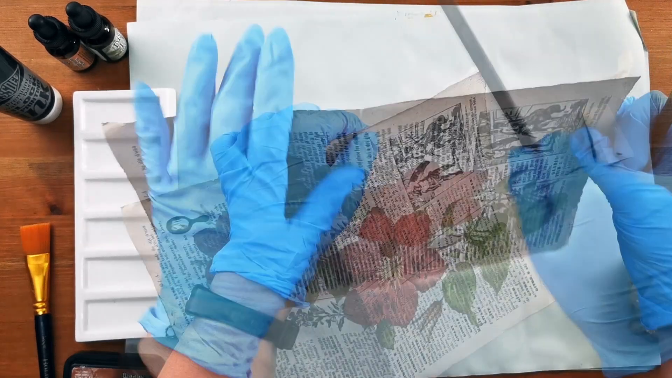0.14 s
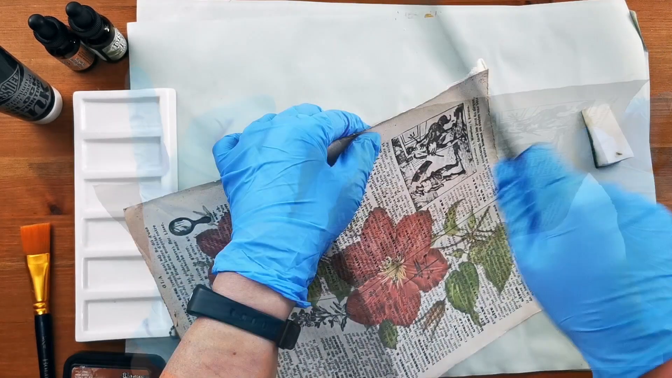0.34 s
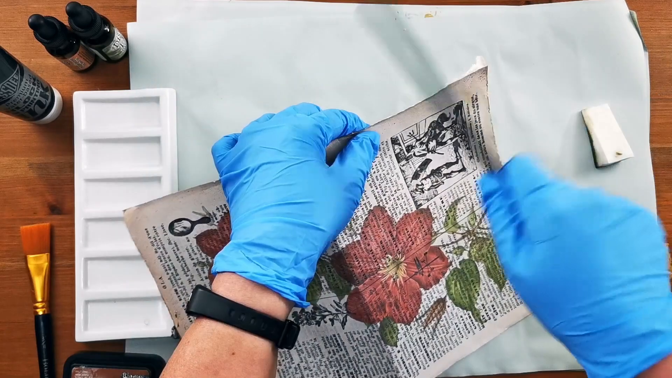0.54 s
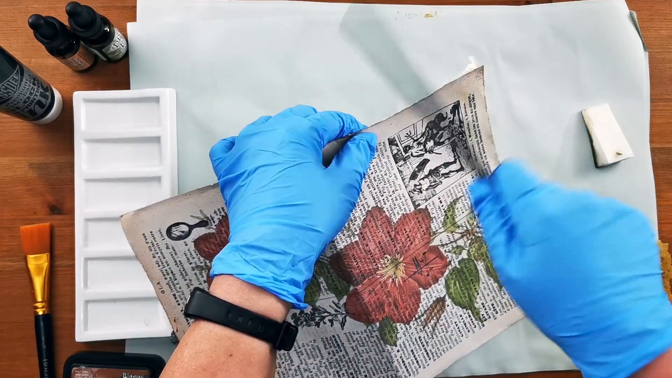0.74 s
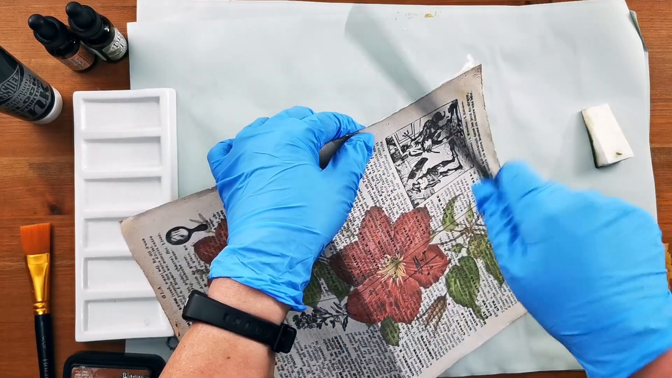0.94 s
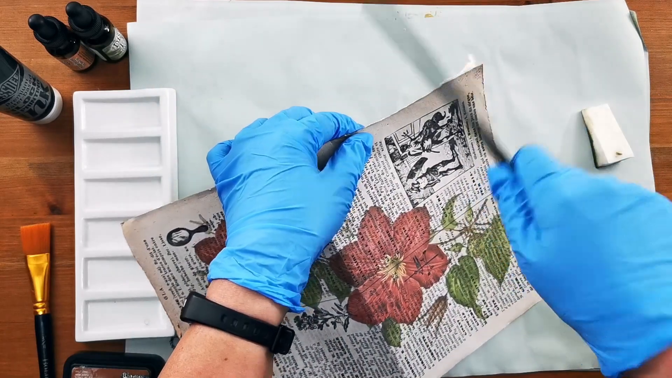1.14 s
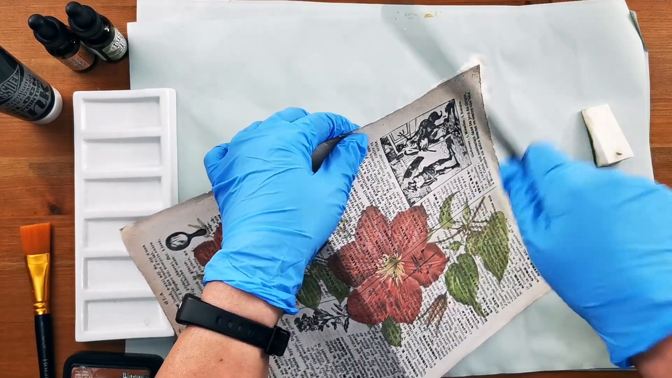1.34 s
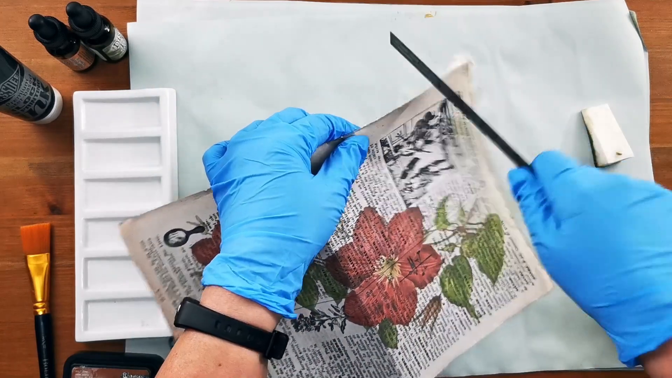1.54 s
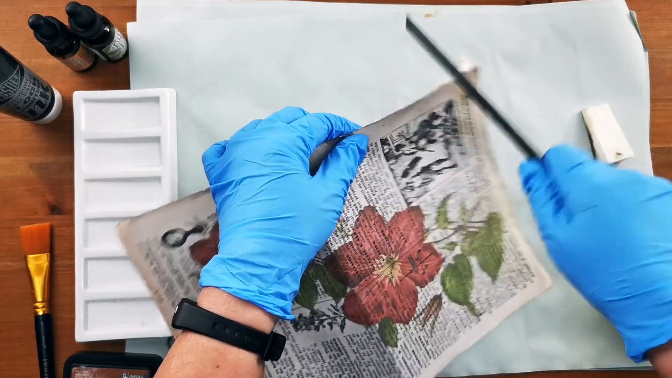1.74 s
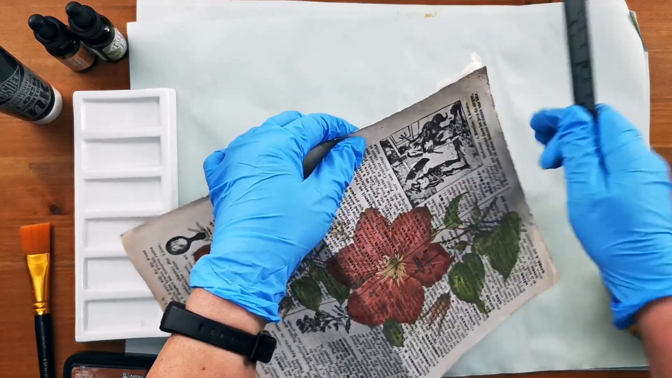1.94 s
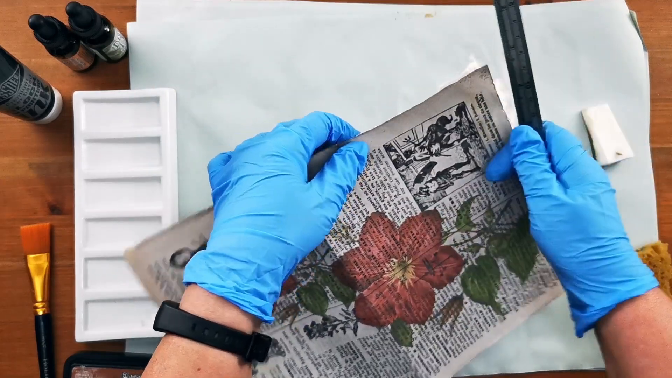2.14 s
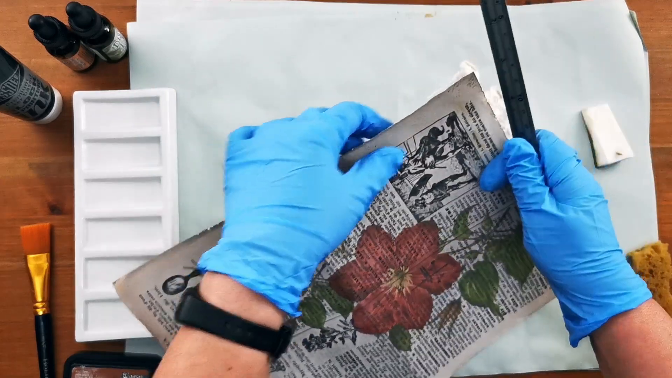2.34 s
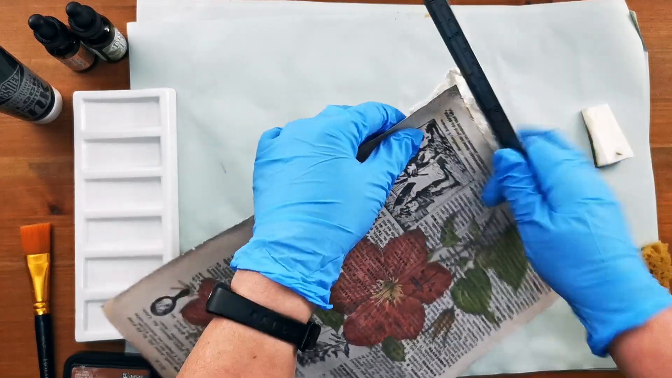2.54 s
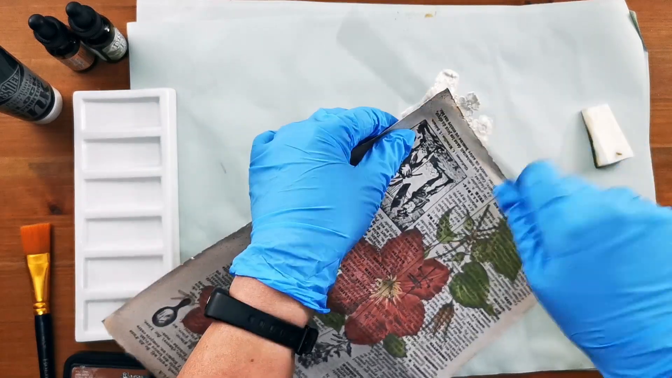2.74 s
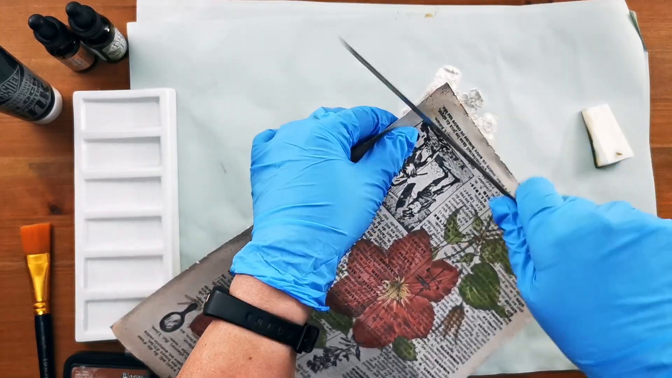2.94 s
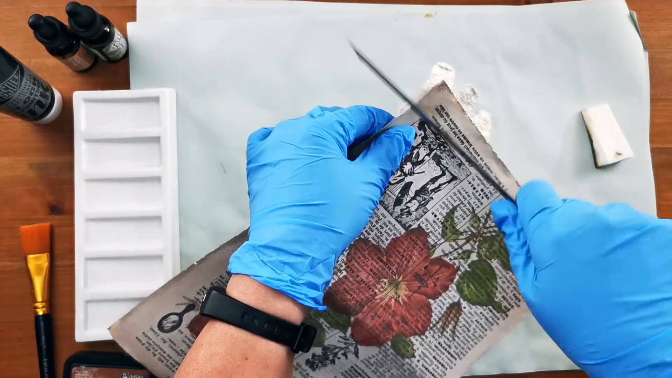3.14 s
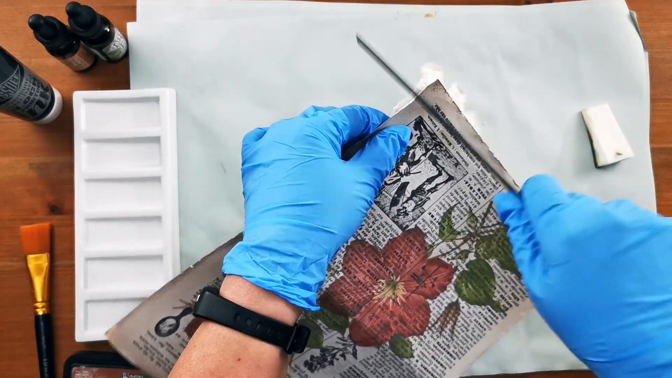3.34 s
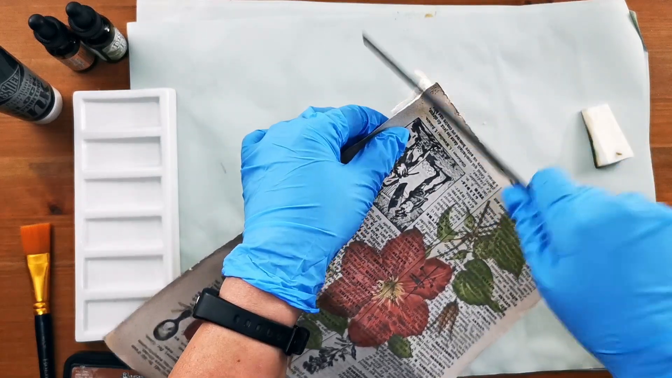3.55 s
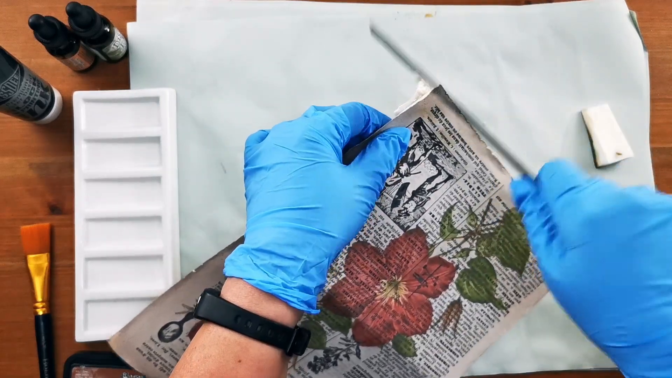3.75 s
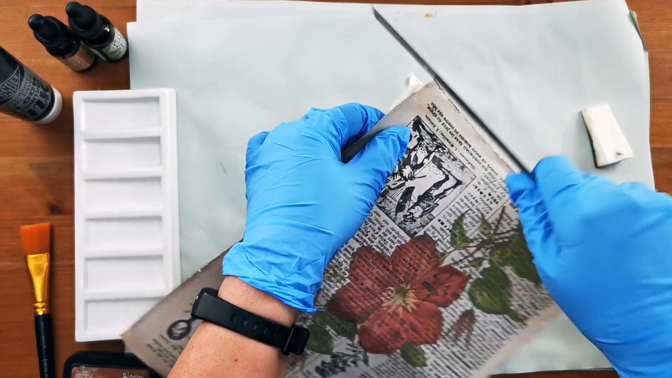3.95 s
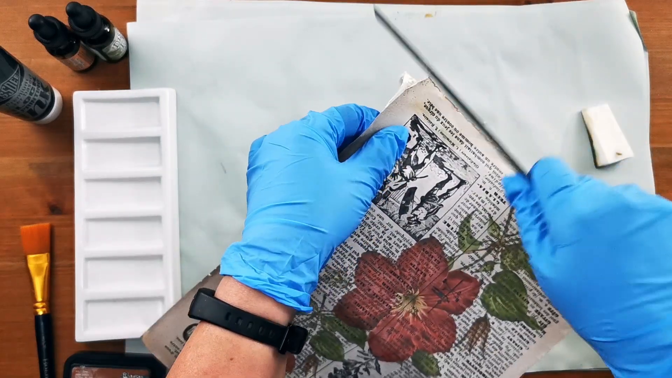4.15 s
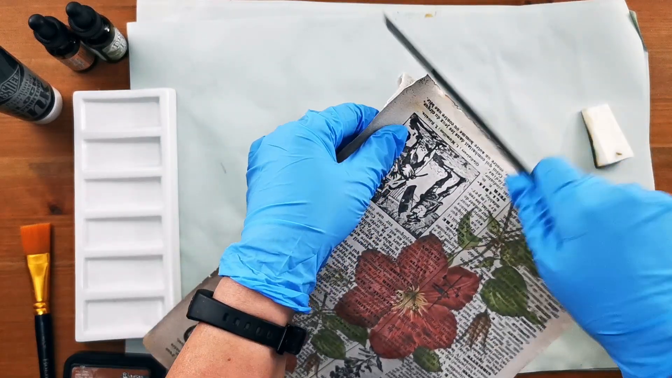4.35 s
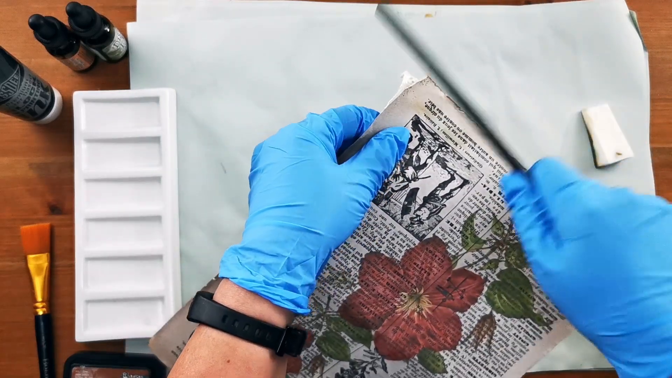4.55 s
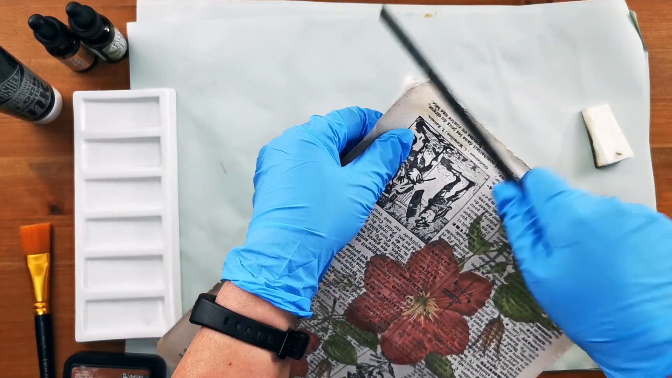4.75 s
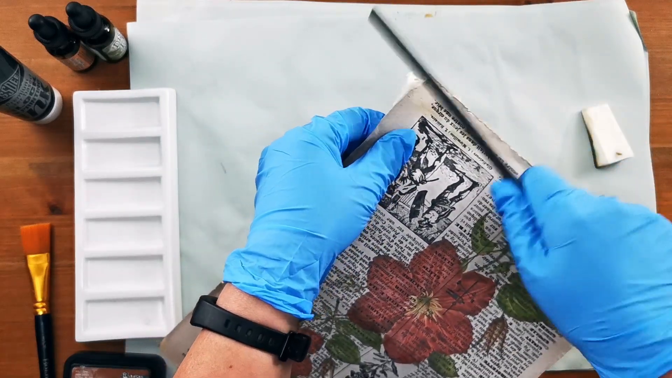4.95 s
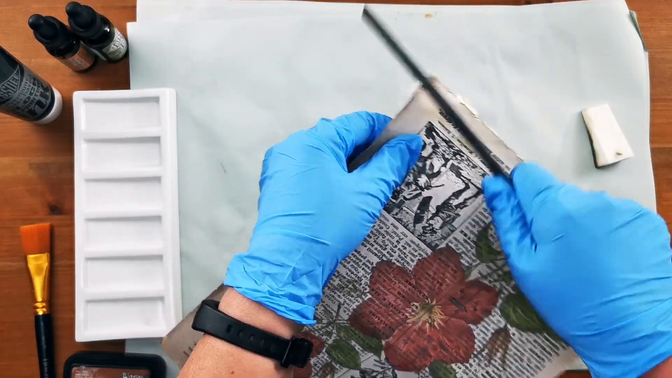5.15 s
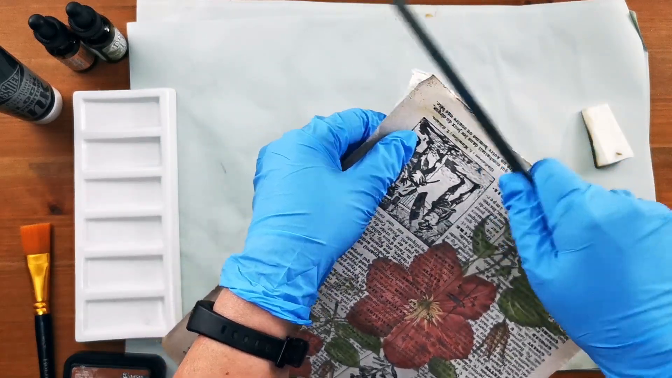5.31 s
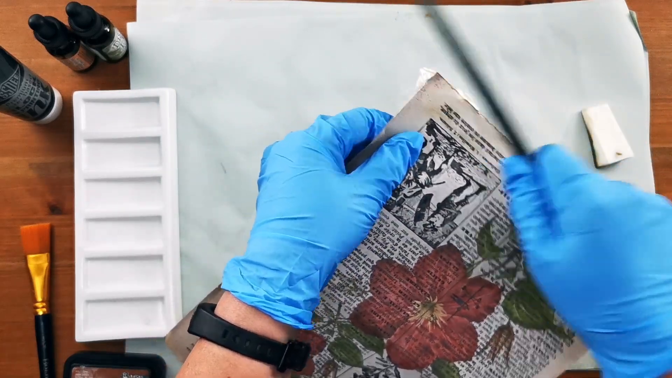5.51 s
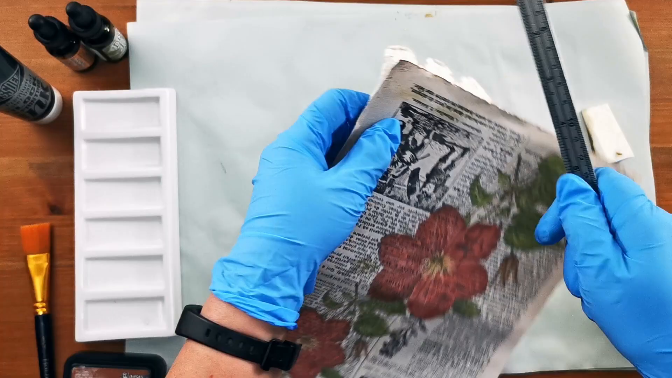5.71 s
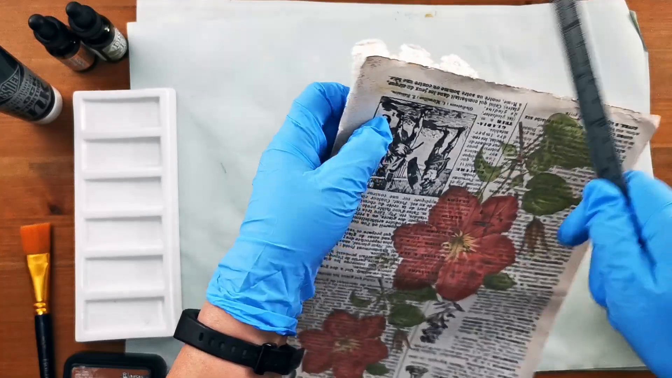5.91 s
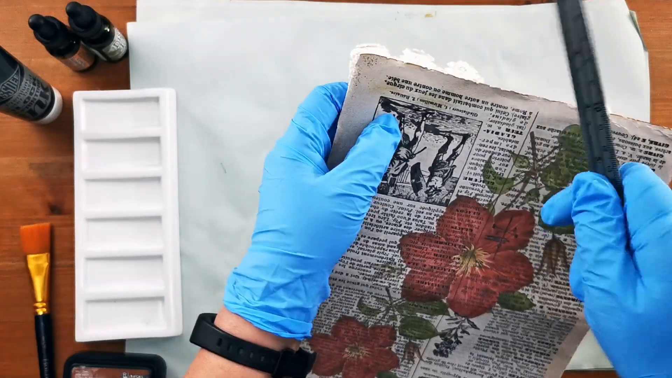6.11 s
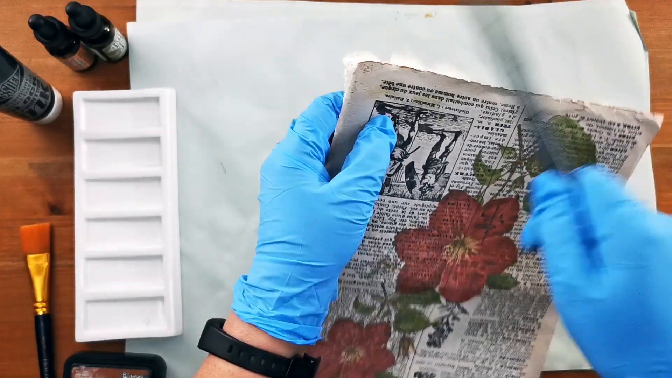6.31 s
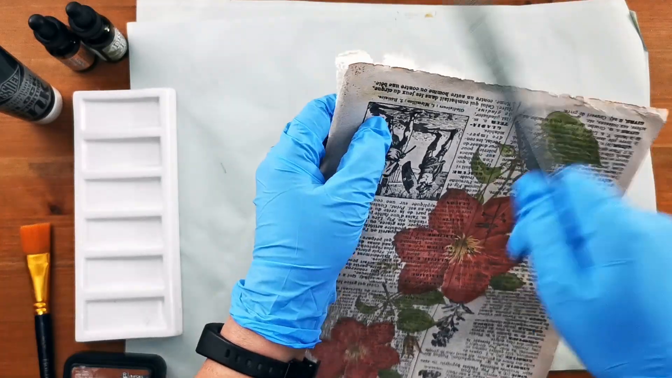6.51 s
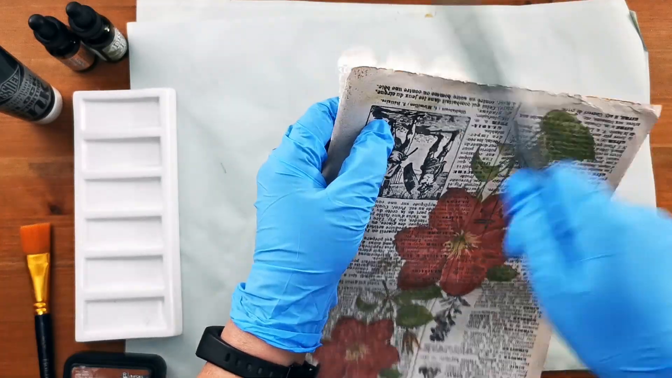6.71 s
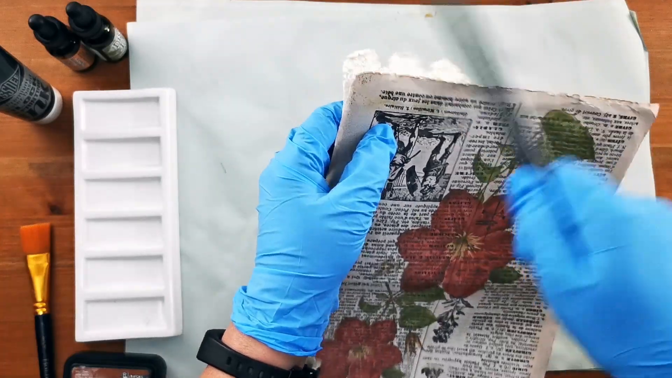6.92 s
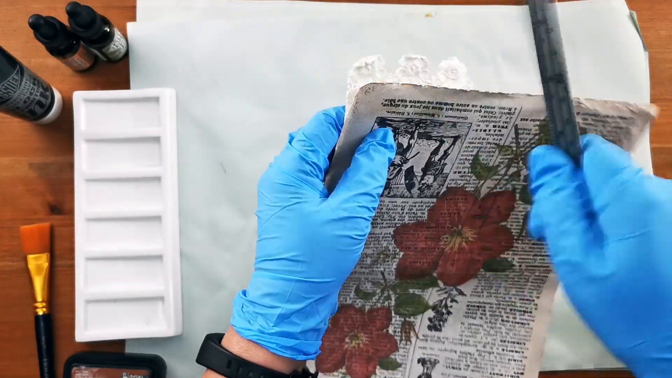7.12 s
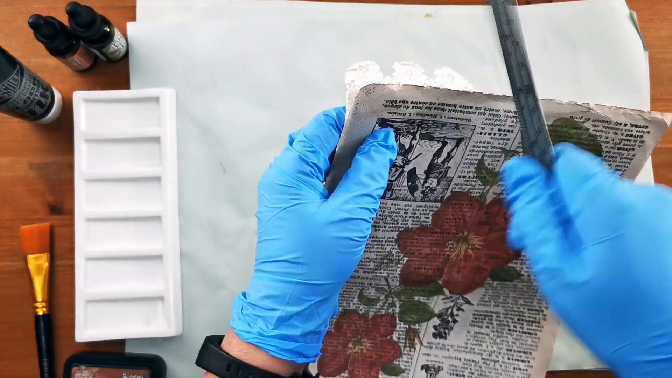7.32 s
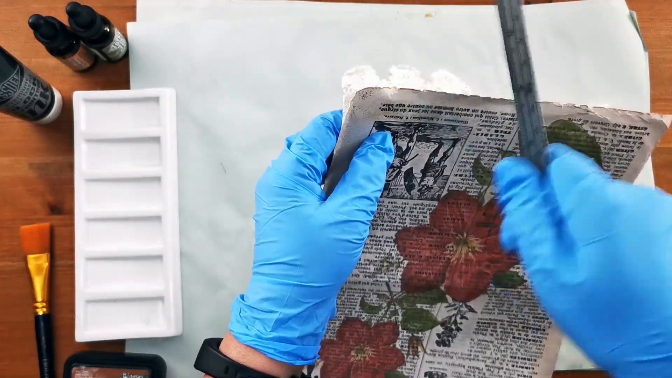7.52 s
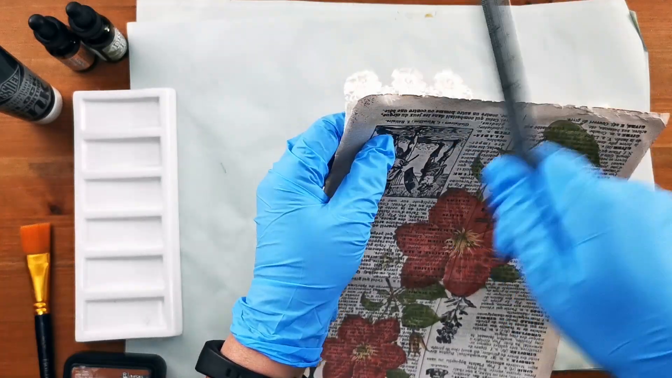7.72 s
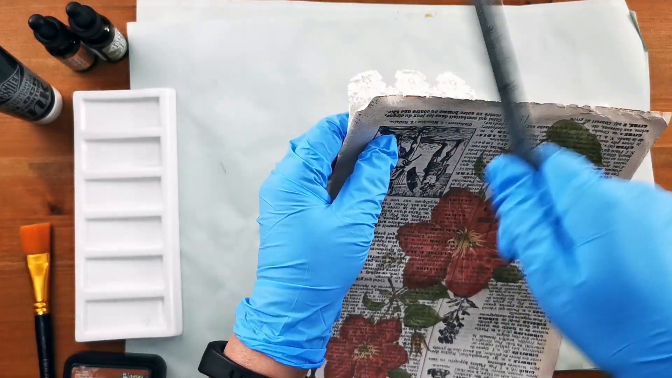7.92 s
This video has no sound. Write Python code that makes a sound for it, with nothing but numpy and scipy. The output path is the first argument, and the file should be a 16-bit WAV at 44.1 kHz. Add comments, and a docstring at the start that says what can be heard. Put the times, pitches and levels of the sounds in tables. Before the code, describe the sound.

A close microphone in a small, quiet room with a very faint hush. Paper slides softly at the start, then from about 0.1 s a steel ruler swipes a stiff sheet's edge roughly every 0.19 s: loud, dry snaps with a short papery crackle, a faint thin metallic ring after some and a weak one near 0.95 s. The run stops around 1.8 s. Until 2.8 s there is soft rustling and sliding, with slight scrapes. From 2.8 to 5.5 s swipes resume at the same pace, generally quieter, brighter and scratchier, some doubled by drags and flaps. Around 5.6 to 6.2 s the sheet is turned with a broad rustle and tiny high squeaks near 5.8 s. From 6.3 s strokes return, raspier and flapping, growing into loud cracks from 7.3 s to the end at about 8 s. Short room reflections follow; the hardest peaks clip.

```python
"""Fraying a paper edge with a steel ruler

At a table in a small, quiet room, a ruler is swiped down a stiff sheet's edge about five times a second.
Each swipe is a burst of noise, flattened and then coloured by the sheet; often the blade drags or the sheet flaps.
Between runs the sheet slides and squeaks on the table: noise under envelopes. The ruler's modes ring as sines.
The microphone is close: swipes come direct and through the room's noise tails, and the largest peaks clip."""
import sys
import numpy as np
from scipy import signal
from scipy.fft import rfft, irfft
from scipy.io import wavfile
from scipy.ndimage import uniform_filter1d

SR = 44100
rng = np.random.default_rng(int(sys.argv[2]) if len(sys.argv) > 2 else 0)


def inscribe(sig):
    """Save sig as 16-bit PCM at rate SR to the path in sys.argv[1].

    A 1-D sig is mono; a 2-D sig holds one channel per row.
    Samples are clipped to [-1, 1] before scaling.
    """
    pcm = np.round(np.clip(np.atleast_2d(sig).T, -1, 1) * 32767)
    wavfile.write(sys.argv[1], SR, pcm.astype(np.int16))


N = 355887
SIZE = 8192  # samples in one short sound
HZ = np.fft.rfftfreq(SIZE, 1 / SR)
T = np.arange(SIZE) / SR


def gain_of(db):
    """Decibels to amplitude."""
    return 10 ** (np.asarray(db) / 20)


def evened(x):
    """Scales to rms 1."""
    return x / np.sqrt(np.mean(x ** 2) + 1e-20)


def read(points, hz):
    """Joins (frequency [Hz], value) points on a log-frequency axis."""
    f, value = np.transpose(points)
    return np.interp(np.log(hz + 1), np.log(f + 1), value)


def add(mix, s, sound):
    """Mixes a sound in at time s, cut off at the end of the scene."""
    part = mix[..., round(s * SR):][..., :sound.shape[-1]]
    part += sound[..., :part.shape[-1]]


def coloured(x, spectrum):
    """Gives a long noise a spectrum, at rms 1."""
    gain = gain_of(read(spectrum, np.fft.rfftfreq(N, 1 / SR)))
    return evened(irfft(rfft(x) * gain, N))


def peak(hz, width):
    """A resonance curve of height 1."""
    return 1 / (1 + (2 * (HZ - hz) / width) ** 2)


def hush(level_db=-57.5):
    """The faint steady background of the room: coloured noise."""
    # spectrum of the hush: (frequency [Hz], relative level [dB])
    hush_colour = [(20, -10), (45, -4), (110, 0.5), (160, -12.5), (250, -8.5), (400, -12), (620, -7.5),
                   (1500, -4), (3000, -12), (6000, -9.5), (11000, -13.5), (16000, -20)]
    return gain_of(level_db) * coloured(rng.standard_normal(N), hush_colour)


def room(x, wall_s=0.019, build_s=0.0053, early_db=-8, count=3):
    """Faint echoes from the table, then the walls: three noise tails crossfade on a slow, steady cycle."""
    # decay of the room: (frequency [Hz], t60 [s])
    decay = [(200, 0.21), (700, 0.39), (2000, 0.39), (5500, 0.32), (14000, 0.22)]
    # strength of the room: (frequency [Hz], level against the sound sent into it [dB])
    strength = [(150, -7.5), (400, -8.5), (700, -10), (1500, -13.5), (3500, -10), (7000, -14.5),
                (14000, -21.5)]
    out = np.zeros(N)
    for k in range(count):
        hz, t, z = signal.stft(rng.standard_normal(SR // 2), SR, nperseg=256)
        t60 = read(decay, hz)[:, None]
        fall_db = read(strength, hz)[:, None] - 60 * (t - wall_s) / t60
        # the root sets the energy of the decaying noise
        z *= gain_of(fall_db) * np.sqrt(2 * np.log(1000) / (t60 * SR))
        tail = signal.istft(z, SR, nperseg=256)[1]
        age = np.arange(len(tail)) / SR
        tail *= np.minimum(age / build_s, 1)
        tail *= np.clip((age - wall_s) / build_s, gain_of(early_db), 1)
        share = np.cos(np.pi * (np.arange(N) / SR + k / count)) * np.sqrt(2 / count)
        out += signal.fftconvolve(x * share, tail)[:N]
    return out


def thumps(push_s=0.0024):
    """Two swipes also push the table top: a soft push, with no ring."""
    # pushes on the table: (time [s], peak level [dB])
    pushes = [(1.423, -26.5), (1.61, -33)]
    out = np.zeros(N)
    for s, db in pushes:
        add(out, s, gain_of(db) * (1 - T / push_s) * np.exp(-T / push_s))
    return out


def steel():
    """The loosely held blade rings after a swipe: thin, slowly dying modes, as sines."""
    # modes of the ruler, a close pair near the top beating: (frequency [Hz], level [dB], t60 [s])
    modes = [(8053, -1, .6), (10600, -6, .6), (12530, 5, .9), (12547, -20, .6)]
    # swipes that leave it ringing: (time [s], level added to each mode's [dB])
    blows = [(.295, -55), (.658, -62), (.847, -61), (1.608, -63)]
    out = np.zeros(N)
    t = np.arange(SR) / SR
    for s, blow_db in blows:
        for hz, db, t60 in modes:
            wave = np.sin(2 * np.pi * (hz * t + rng.random()))
            add(out, s, gain_of(blow_db + db - 60 * t / t60) * wave)
    return out


def squeaks(width_hz=350):
    """The sheet catches as it turns, in brief stick-slip: a fuzzy whistle that swells and stops."""
    # squeaks: (time [s], length [s], frequency [Hz], rms level before the swell [dB])
    catches = [(5.779, 0.03, 6700, -34), (5.799, 0.026, 5660, -34.5), (5.876, 0.012, 6230, -31)]
    out = np.zeros(N)
    for s, length, hz, db in catches:
        whistle = evened(irfft(rfft(rng.standard_normal(SIZE)) * peak(hz, width_hz)))
        swell = np.sin(np.pi * np.minimum(T / length, 1))
        add(out, s, gain_of(db) * whistle * swell)
    return out


def fibres(size, spread_db):
    """Dense tiny snaps of paper fibres, a few much larger than the rest."""
    size_db = spread_db * np.minimum(rng.exponential(1, size), 4)
    return rng.standard_normal(size) * gain_of(size_db)


def patchy(x, patchy_db, size=(4, 7)):
    """The contact wanders, so narrow bands swell and fade for some milliseconds each."""
    z = signal.stft(x, nperseg=256)[2]
    across_hz = uniform_filter1d(rng.standard_normal(z.shape), size[0], 0)
    patches = evened(uniform_filter1d(across_hz, size[1], 1))
    return evened(signal.istft(z * gain_of(patchy_db * patches), nperseg=256)[1][:N])


def slides(rub_db=0.5, fizz_db=-2, spread_db=3.5, judder_db=1, patchy_db=2.0,
           scuffs_per_s=32, scuff_db=6, scuff_s=0.0014):
    """Paper slides over paper with uneven friction: a broad rub and a fine fizz, with small scuffs."""
    # paper and gloves slide, one row a push, before the trims rub_db and fizz_db:
    # (time [s], rise [s], hold [s], fall t60 [s], rub level [dB], fizz against the rub [dB])
    pushes = [(0, 0.0013, 0.066, 0.66, -42, -5.5), (0.095, 0.03, 0.011, 0.53, -37.5, 1),
              (1.88, 0.065, 0.013, 0.16, -42, 2), (1.99, .03, 0.2, .3, -51.5, -6.5),
              (2.167, 0.057, 0.075, 0.41, -42, -2), (2.327, 0.061, .14, .25, -48.5, 3),
              (2.511, .012, 0.015, 0.12, -39.5, -4), (2.578, 0.015, 0.004, 0.32, -40, 1),
              (2.734, 0.02, 0.011, 0.16, -42, 8.5), (5.583, .17, .18, .45, -35, -5),
              (6.0, 0.034, 0.18, 0.3, -49.5, -5), (6.107, 0.02, .015, 0.091, -43, 3.5)]
    # spectrum of the broad rub: (frequency [Hz], relative level per Hz [dB])
    rub_colour = [(150, -27), (300, -25.5), (450, -16.5), (600, -1.5), (790, -3), (900, -6), (1350, -1),
                  (1850, 1), (2300, -2.5), (2750, -0.5), (4000, 0), (6600, -0.5), (9000, -10.5),
                  (12000, -39)]
    # spectrum of the fine fizz: (frequency [Hz], relative level per Hz [dB])
    fizz_colour = [(3000, -22), (6000, -15.5), (8000, 1), (12000, -1.5), (16000, -5.5)]
    t = np.arange(N) / SR
    rub, fizz = np.zeros((2, N))
    for s, rise, hold, t60, db, fine_db in pushes:
        fall_db = 60 * np.clip(t - s - rise - hold, 0, 2 * t60) / t60
        push = np.clip((t - s) / rise, 0, 1) * gain_of(db - fall_db)
        rub = np.hypot(rub, gain_of(rub_db) * push)
        fizz = np.hypot(fizz, gain_of(fizz_db + fine_db) * push)
    judder = gain_of(judder_db * evened(uniform_filter1d(rng.standard_normal(N), size=400)))
    # scuffs start at random moments and die away
    catches = rng.random(N) * (rng.random(N) < scuffs_per_s / SR)
    judder += gain_of(scuff_db) * signal.lfilter([1], [1, -np.exp(-1 / (scuff_s * SR))], catches)
    coarse = patchy(fibres(N, spread_db), patchy_db)
    fine = patchy(fibres(N, spread_db), patchy_db)
    return judder * (rub * coloured(coarse, rub_colour) + fizz * coloured(fine, fizz_colour))


def burst(envelope, spread_db, evenness=0.36, count=2):
    """Fibre snaps under an envelope, with energy 1 spread fairly evenly over all frequencies."""
    x = fibres(SIZE, spread_db) * envelope
    reach = np.minimum(envelope / envelope.max() * 10, 1)  # keeps the flattened noise within the envelope
    for _ in range(count):
        z = rfft(x)
        x = irfft(z / (abs(z) + 1e-9) ** min(evenness, 1)) * reach
    return x / np.linalg.norm(x)


def creases(ripple_db=1.8, size=36):
    """The sheet bends differently under every stroke: its many small modes ripple the spectrum (dB)."""
    ripple = uniform_filter1d(rng.standard_normal(len(HZ)), size)
    return ripple_db * evened(uniform_filter1d(ripple, size))


def sheet(push, s, db, weight_db, bright_db, note_hz, note_db, bass_hz=220, lost_db=-9,
          note_width=0.08, note_share=0.56, blend=0.39, bounce=0.28, bobbing=0.069,
          linger_db=3, linger_width=0.21):
    """The sheet rings after a push. Returns the sound near by and the blander sound sent into the room."""
    # where thump, flap, middle, clack, snap and tick lie: (frequency [Hz])
    colour_hz = [200, 650, 1300, 2600, 5500, 13000]
    # resonances of the sheet over the table, and dips: (frequency [Hz], width [Hz], height [dB])
    resonances = [(277, 80, 3), (340, 27, -6.5), (445, 44, 2), (617, 125, 11), (769, 74, 9), (928, 25, -7),
                  (1836, 56, 4.5), (2140, 59, -5), (3770, 890, -2), (4770, 220, 2.5), (7200, 230, -0.5),
                  (12100, 510, 7)]
    # colour of the sheet from all sides at once, as the room gets it: (frequency [Hz], level [dB])
    all_round = [(200, -4.5), (650, -19.5), (1300, 2.5), (2600, -4.5), (5500, -5.5), (13000, 1)]
    # the way sheet and blade are held colours the swipes from each time on, sometimes only one:
    # (from time [s], thump [dB], clack [dB], tick [dB], where the loose paper lingers [Hz],
    # typical delay of the reflection off the table [s])
    grips = [(0, -5, -2.5, 0.5, 1460, 0.0024), (2.3, 1, 1.5, -0.5, 3500, 0.0012),
             (3.3, -0.5, 4, -7, 3440, .00188), (4.1, 3, -1.5, -4, 2480, 0.00093),
             (4.3, -2, -0.5, -5, 2430, 0.001392), (6.2, 4.5, 0.1, -3.5, 5000, .00286),
             (7.2, 4, 0.5, -4, 1650, .0014)]
    # colour of a middling swipe: (frequency [Hz], level [dB])
    swipe = [(60, -19), (200, -17), (650, -5.5), (1300, -0.5), (2600, -1.42), (5500, -5.5), (13000, -15),
             (16000, -20)]
    # share of its weight that each band takes: (frequency [Hz], share [1])
    weight_share = [(650, 1), (1300, 0)]
    # share of its brightness that each band takes: (frequency [Hz], share [1])
    bright_share = [(1300, 0.036), (2600, 0.52), (5500, 1.03), (13000, 1.35)]

    _, thump, clack, tick, linger_hz, table_s = grips[sum(s >= grip[0] for grip in grips[1:])]
    tilt_db = read(swipe, HZ) + weight_db * read(weight_share, HZ) + bright_db * read(bright_share, HZ)
    # averaged over all directions, one stroke's colour comes closer to the next's
    towards_db = read(all_round, HZ) - tilt_db
    towards_db -= np.average(towards_db, weights=gain_of(tilt_db) / (HZ + colour_hz[1]))
    shape_db = db + tilt_db + lost_db * peak(0, bass_hz)  # a thin sheet radiates little bass
    shape_db += sum(height * peak(hz, width) for hz, width, height in resonances)
    shape_db += read(list(zip(colour_hz, [thump, 0, 0, clack, 0, tick])), HZ)
    # a taller note has wider skirts
    note = note_db * peak(note_hz, note_width * note_hz * np.sqrt(3.5 + abs(note_db)))
    linger = linger_db * peak(linger_hz, linger_width * linger_hz)
    near_db = shape_db + note + creases()
    far_db = shape_db + note_share * note + blend * towards_db + linger
    # minimum phase: the ringing follows the push
    log_gain = np.log(gain_of([near_db, far_db]))
    causal = np.exp(signal.hilbert(np.hstack([log_gain, log_gain[:, -2:0:-1]])).conj())
    near, far = rfft(push) * causal[:, :len(HZ)]
    delay_s = table_s * np.exp(bobbing * rng.standard_normal())  # the sheet bobs above the table
    # its underside pushes in opposite phase
    reflection = 1 - bounce * np.exp(-2j * np.pi * HZ * delay_s)
    return irfft(np.array([near * reflection, far]))


def drags(rise_s=0.0006, release_t60=0.034, spread_db=4.5, level_db=-1):
    """The blade rasps on through the fibres for a moment, then slips off, or the sheet flaps; some are the
    blade brushing the edge on its way back up, just before a swipe."""
    # drags, flaps, and brushes of the blade on its way back up before a swipe: (time [s], length [s], strength
    # [dB], # weight of the flapping paper [dB], brightness [dB], note of the pinched stretch of paper [Hz],
    # height of that note [dB])
    rasps = [(0.43, 0.06, -13, -1, 3, 2060, 15), (1.45, 0.0039, 5, 2, -7, 940, 17.3),
             (1.633, 0.0093, 12.5, 2, -7, 1180, 5.9), (1.811, 0.02, 12.5, 0, -12.5, 2030, 6.5),
             (2.408, 0.0036, -23, 4, 8, 1270, 20), (2.611, 0.0032, -20.5, 22.5, 12, 1040, 5.7),
             (3.588, 0.019, -9.5, 20.5, -12, 1070, 6.1), (3.616, 0.0056, -10.5, 9, 4, 2150, 12.3),
             (4.051, 0.0088, -12.5, 14, 6, 930, 9), (4.122, 0.031, -9.5, -5, 9.5, 3390, 5),
             (4.375, 0.012, 0, 8.5, 18, 2280, 18.3), (4.716, 0.033, -17.5, -4, 8, 2660, 2.7),
             (4.804, 0.0052, -14.5, 18.5, 15, 1870, 13.5), (4.999, 0.0057, -2.0, -8, 13.5, 2090, 24.6),
             (5.224, 0.029, 0, 4.5, 10.5, 1790, 9.2), (5.446, 0.0066, 1, 4.5, 13.5, 1760, 16),
             (5.466, 0.052, -3.5, 4.5, 13.5, 1850, 11), (5.547, 0.01, -10.5, 3, 10.0, 1730, 7.6),
             (6.327, 0.011, 15.5, 5.5, -19, 1620, 7.7), (6.401, 0.011, -5.5, -7, 8.5, 1640, 5.8),
             (6.529, 0.02, -8.5, 16, -15, 2290, 3), (6.595, 0.008, -8, -15, 2, 3600, 3),
             (6.707, 0.012, -1.0, 16, 0, 1370, 12.3), (6.783, 0.021, -10, -2, 6.5, 2660, 5),
             (6.833, 0.037, -10.5, -2, 4.5, 2830, 7), (6.902, 0.021, -2, 14.5, -9, 2580, 5.2),
             (7.081, 0.011, 1, 11, 0, 2660, 5), (7.153, 0.017, -6.5, 8, 8, 1040, 3),
             (7.288, 0.0076, -3, 12.5, -10, 1040, 9.7), (7.475, 0.017, 14, 5.5, -27, 1170, 7),
             (7.693, 0.0068, -13.5, 5, 13, 1500, 15), (7.86, 0.028, 8, -14, -2.5, 2360, 8.2),
             (7.9, 0.014, -1.5, -7, 9, 2460, 12)]
    out = np.zeros((2, N))
    for s, length, *touch in rasps:
        release_db = -60 * np.maximum(T - length, 0) / release_t60
        envelope = np.minimum(T / rise_s, 1) * gain_of(release_db)
        add(out, s, gain_of(level_db) * sheet(burst(envelope, spread_db), s, *touch))
    return out


def strikes(contact_s=.00025, contact_db=9, crack_s=.0024, crack_db=4.5, spread_db=3.0,
            flutter_db=-24, flutter_t60=0.2):
    """The blade meets the edge with a click and a crack; the paper dies in a crackle and flutters on."""
    # the blade meets the edge: (time [s], crackle t60 [s], strength [dB], weight of the flapping paper [dB],
    # brightness [dB], note of the pinched stretch of paper [Hz], height of that note [dB])
    snaps = [(0.11, 0.043, 4.5, 0, -2, 1450, 13), (0.2948, 0.029, 18, 0.5, -9.5, 1580, 7),
             (0.4716, 0.026, 23.0, 0.0, -4.5, 2190, 7), (0.6571, 0.031, 18.5, 1.5, 0.5, 2270, 6),
             (0.8464, 0.049, 16.5, 9.5, -9, 2300, 8), (0.951, 0.049, -5.0, -6, 11.5, 3660, 5.5),
             (1.0398, 0.037, 20, 6, -3.5, 2280, 6.5), (1.2379, 0.024, 23, 1.5, -8, 1610, 6.5),
             (1.421, 0.034, 25, -2, -5.0, 1233, 5), (1.6086, 0.035, 18.5, 3.5, 1.5, 1200, 11),
             (1.7947, 0.04, 24.5, -2.5, -14, 925, 4), (2.8362, 0.045, 1, 11.5, 12.5, 1120, 16),
             (3.017, 0.048, 6, 4, 12.5, 1070, 8.5), (3.2062, 0.045, 7.5, -1, 6, 1010, 7),
             (3.394, 0.047, 14, -0.5, 2.5, 990, 9), (3.5732, 0.081, 7, 7, 1, 2920, 6.5),
             (3.7695, 0.062, 15.5, 0, 1, 2270, 5.5), (3.9657, 0.038, 4, 0, 16.5, 2130, 7),
             (3.976, 0.047, 16.5, 3, -18, 1050, 10), (4.1652, 0.039, -5, 12.5, 24, 1810, 12),
             (4.3704, 0.051, 3.5, 4.5, 6.5, 1740, 11), (4.5642, 0.029, -9, 15.0, 17, 1940, 18),
             (4.6, 0.033, -12.5, 12.5, 13.5, 2430, 18), (4.7547, 0.063, 0.5, 12, 8, 2000, 15.5),
             (4.9642, 0.064, 3, 4.5, 4.5, 2000, 12), (5.1871, 0.08, -9.5, 18, 14.5, 1890, 16),
             (5.4376, 0.14, -1, 8, 14, 1900, 17.5), (6.3104, 0.089, 10.5, -0.5, 5, 1590, 10),
             (6.51, 0.083, 5, 5.5, 6, 1430, 10), (6.6939, 0.11, 5.5, 8.5, 10.0, 2030, 5.5),
             (6.882, 0.068, 8.5, 5, 6.5, 2430, 14.5), (7.0698, 0.06, 12.5, -3.5, 6, 1650, 7),
             (7.2762, 0.035, 23, -12, -9, 1114, 8), (7.4635, 0.069, 17.0, -2.5, -2.5, 1700, 6),
             (7.6552, 0.096, 11.5, 4, 0.5, 1260, 9.5), (7.845, 0.061, 23.5, -14, -2.5, 2990, 7.5),
             (8.0485, 0.028, 19.0, -12.5, -8, 3540, 8.5)]
    out = np.zeros((2, N))
    for s, t60, *touch in snaps:
        crackle_db = crack_db * (T < crack_s) - 60 * np.maximum(T - crack_s, 0) / t60
        click = gain_of(contact_db) * (T < contact_s)
        flutter = gain_of(flutter_db - 60 * T / flutter_t60)
        envelope = gain_of(crackle_db) + click + flutter
        add(out, s, sheet(burst(envelope, spread_db), s, *touch))
    return out


def scene():
    """Ruler and paper close by and in the room, over its faint hush."""
    near, far = strikes() + drags() + steel() + thumps() + slides() + squeaks()
    return (near + room(far) + hush())[None]


def record(dry, edge_hz=15900):
    """The microphone overloads: the largest peaks clip at full scale; then the band limit."""
    clipped = np.clip(dry, -1, 1)
    low_pass = signal.firwin(255, edge_hz, window=("kaiser", 9), fs=SR)
    return signal.oaconvolve(clipped, low_pass[None], "same")


dry = scene()
out = record(dry)
inscribe(out)
```